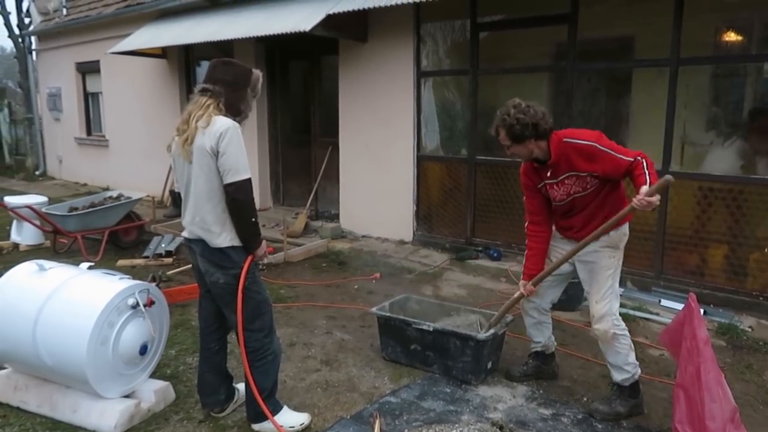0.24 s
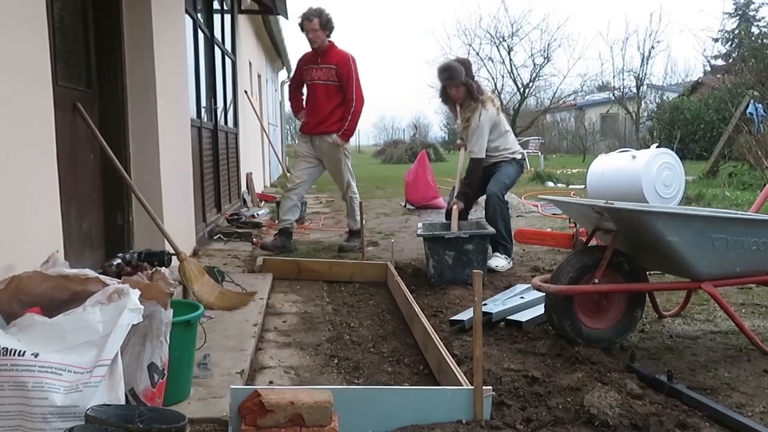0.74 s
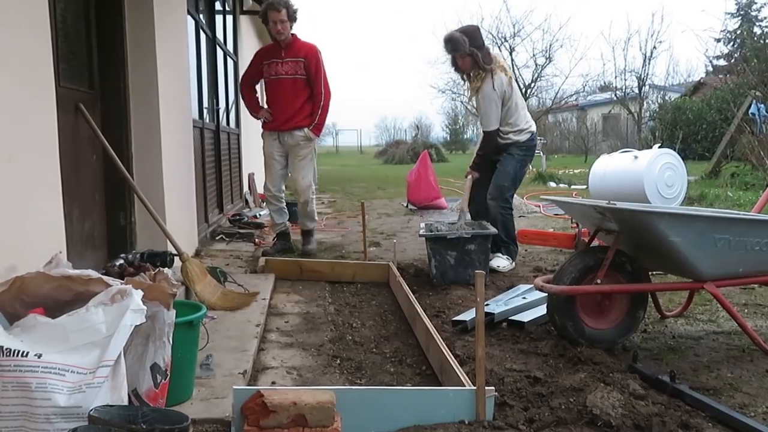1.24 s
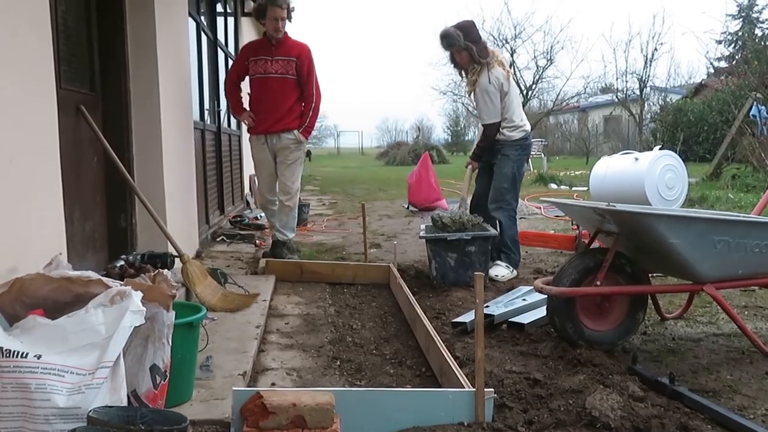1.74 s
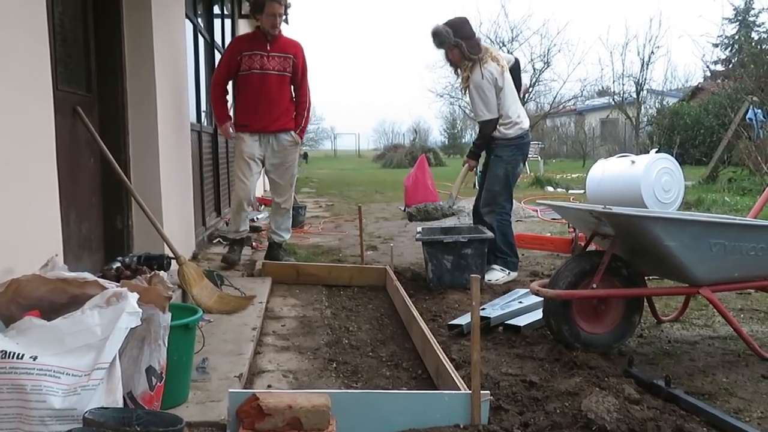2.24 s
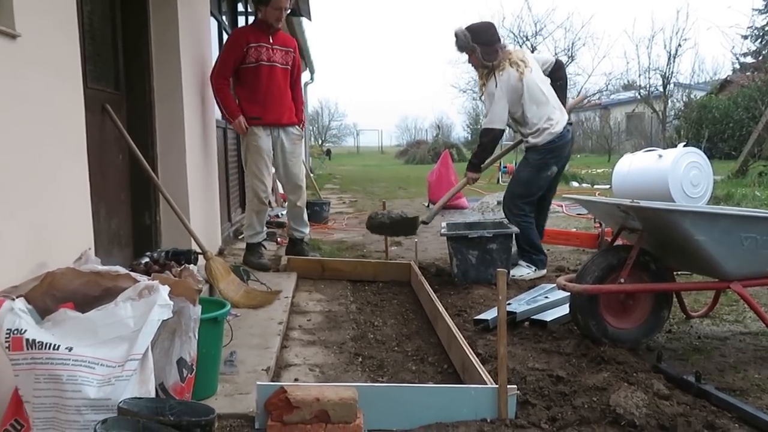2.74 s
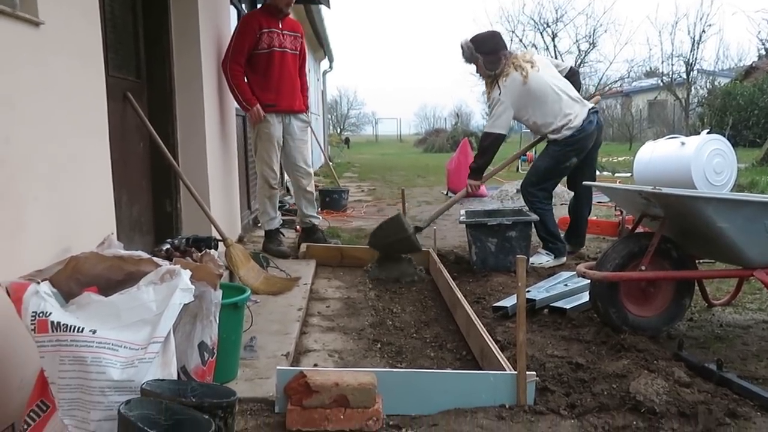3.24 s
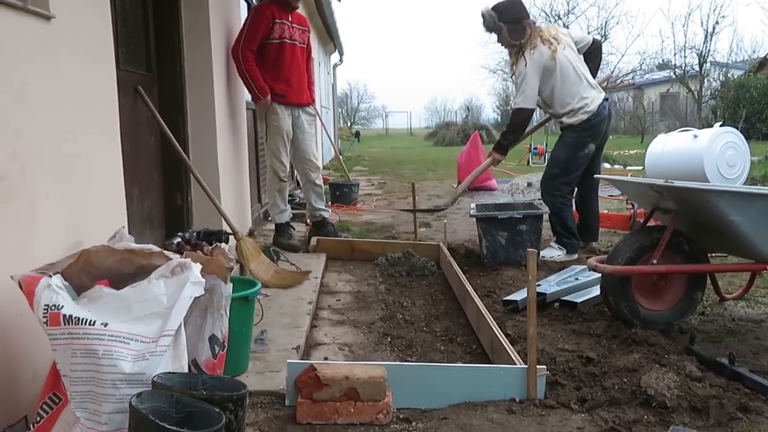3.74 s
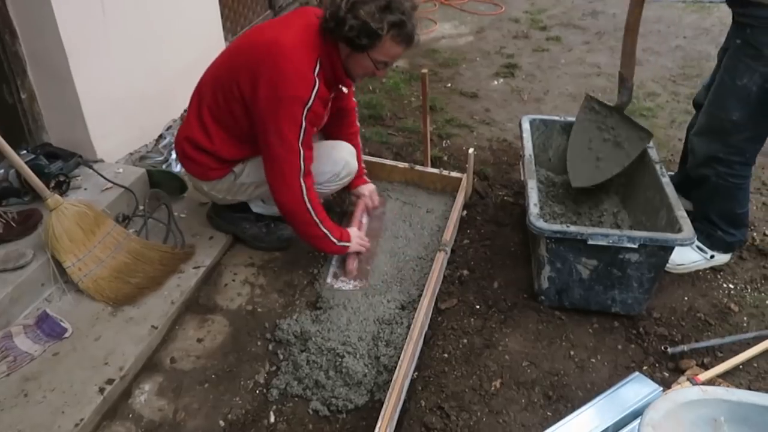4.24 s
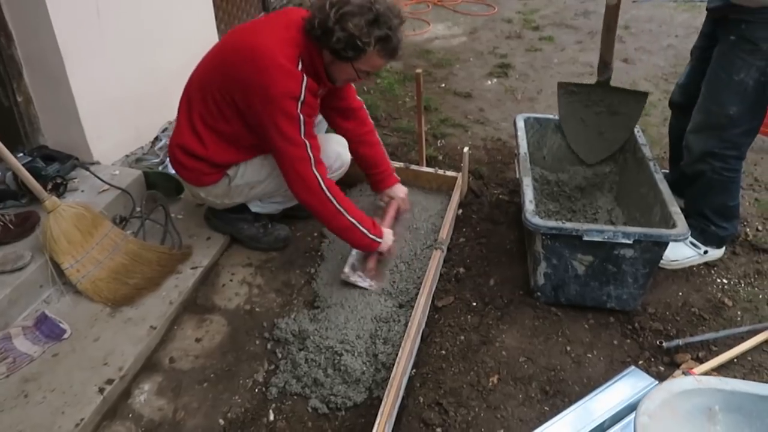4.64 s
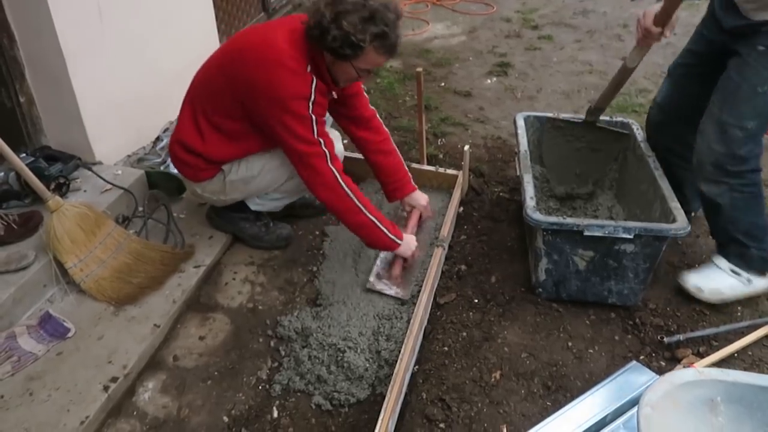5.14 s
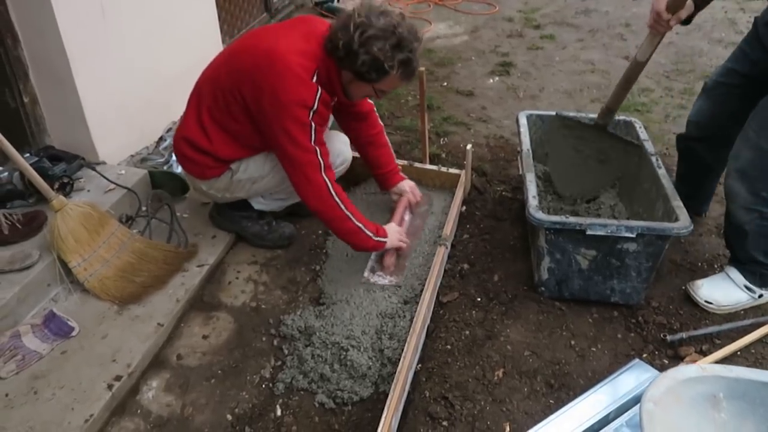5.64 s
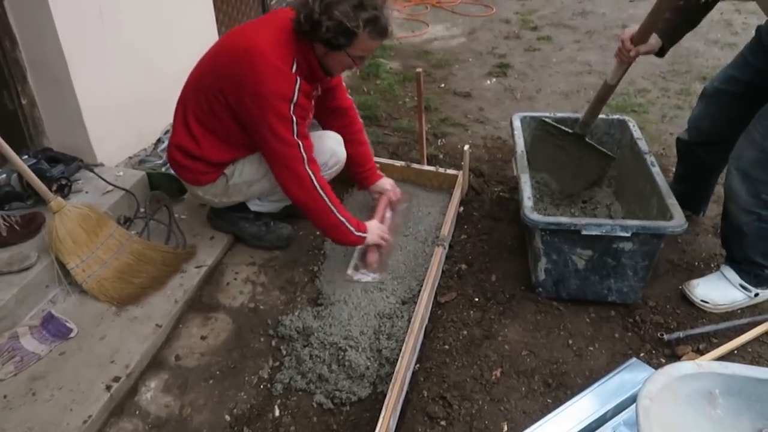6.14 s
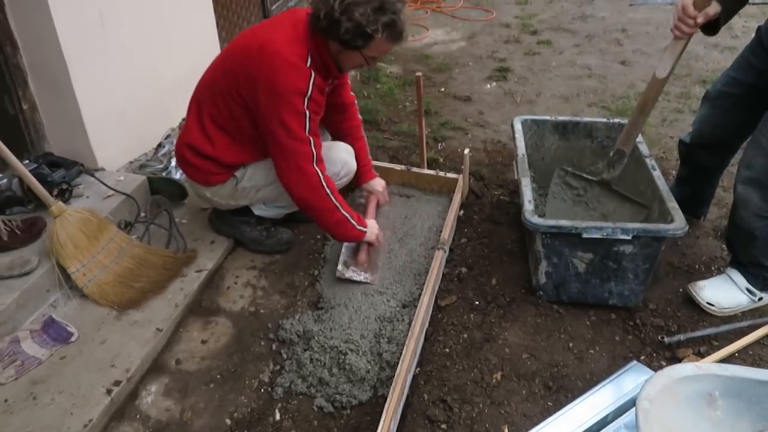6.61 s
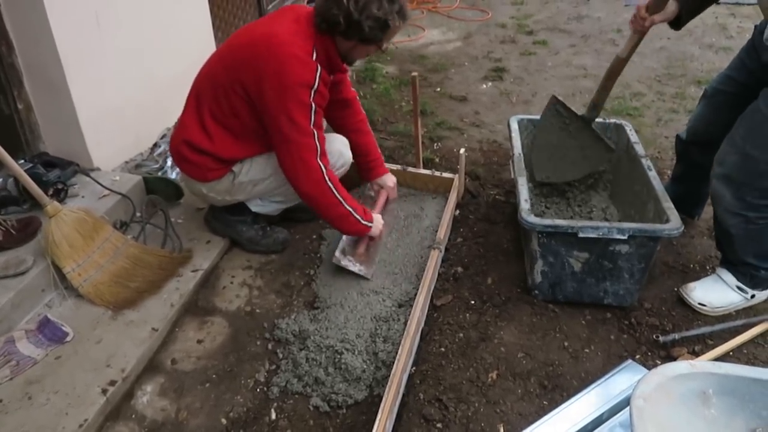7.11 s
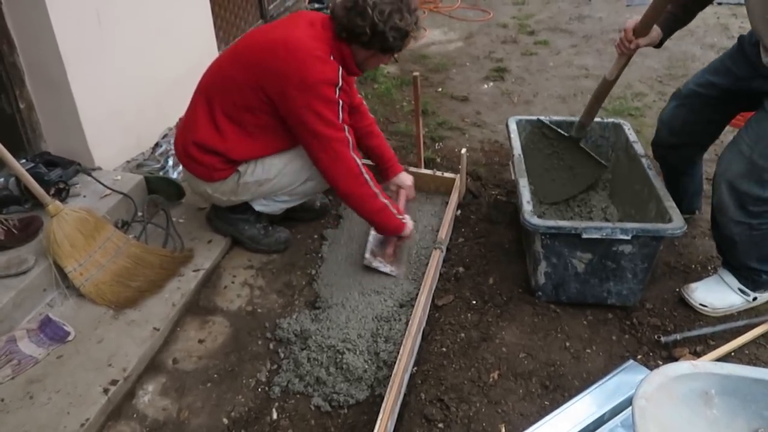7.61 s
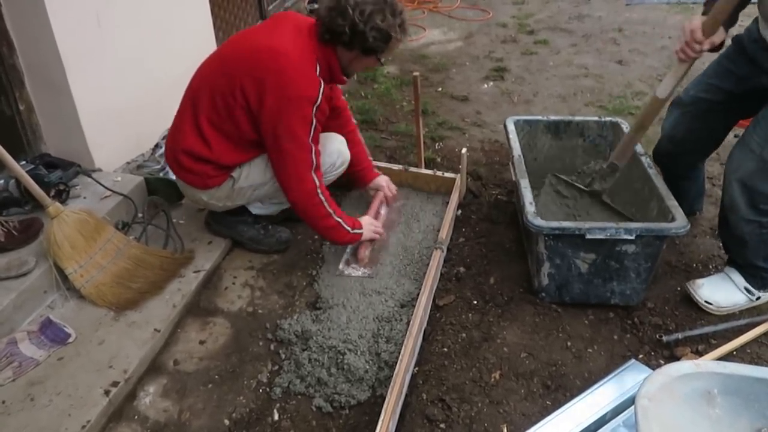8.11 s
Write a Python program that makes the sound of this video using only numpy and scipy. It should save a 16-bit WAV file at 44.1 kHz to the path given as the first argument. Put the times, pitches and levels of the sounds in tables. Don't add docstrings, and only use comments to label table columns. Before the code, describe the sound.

Separate shovel drags through wet gravel come first, moderately distant, with pebble snaps, metallic clinks and hollow tub thuds over faint low traffic. After a quiet stretch and one harsh scrape, the sound abruptly becomes close and loud: a trowel rakes to and fro about three times a second, steel ringing and briefly squealing, with heavy bumps on the plastic tub. Dry open air, compact stereo microphone.

```python
import sys
import numpy as np
from scipy import signal
from scipy.io import wavfile
from scipy.ndimage import uniform_filter1d

SR = 44100
rng = np.random.default_rng(int(sys.argv[2]) if len(sys.argv) > 2 else 0)


def field_ratio(decibels):
    return 10 ** (np.asarray(decibels, dtype=float) / 20)


def wav_out(sig):
    wavfile.write(sys.argv[1], SR, np.round(np.clip(np.atleast_2d(sig).T, -1, 1) * 32767).astype(np.int16))


N = 369116
FIRST_CUT_S, CUT_S = 0.73, 3.9435
MS = np.arange(0, N / SR, 0.001)


def read(points, hz):
    f, value = np.transpose(points)
    return np.interp(np.log(hz + 1), np.log(f + 1), value)


def evened(x):
    return x / np.sqrt(np.mean(x ** 2) + 1e-20)


def curve(rows, t):
    s, *columns = np.transpose(rows)
    return [np.interp(t, s, c) for c in columns]


def add(mix, s, sound):
    part = mix[round(s * SR):][:len(sound)]
    part += sound[:len(part)]


def clicks(per_s, spread_db, dense):
    size_db = spread_db * np.minimum(rng.exponential(1, (2, N)), 3.5)
    size = field_ratio(size_db) * rng.standard_normal((2, N))
    struck = rng.random((2, N)) < per_s / SR
    return evened(size * struck) + dense * rng.standard_normal((2, N))


def drift(shape, wide, long):
    patches = uniform_filter1d(rng.standard_normal(shape), wide, 0)
    return evened(uniform_filter1d(patches, long, 1))


def shaped(x, field, size):
    overlap = size * 3 // 4
    hz, s, z = signal.stft(x, SR, nperseg=size, noverlap=overlap)
    z = z * field_ratio(field(hz[:, None], s))
    return signal.istft(z, SR, nperseg=size, noverlap=overlap)[1][..., :N]


def resonate(x, hz, width):
    r = np.exp(-np.pi * width / SR)
    return signal.lfilter([1 - r, 0, r - 1], [1, -2 * r * np.cos(2 * np.pi * hz / SR), r * r], x)


def ring(hz, t60, rise_s):
    t = np.arange(SR // 2) / SR
    return field_ratio(-60 * t / t60) * np.sin(2 * np.pi * hz * t) * (1 - np.exp(-t / rise_s))


def swells(rows):
    s, db, swell_s, fade_s = np.transpose(rows)[:4, :, None]
    return db - 20 * np.maximum((s - MS) / swell_s, (MS - s) / fade_s)


def leading(levels_db, rows, rest_db, rest_colour):
    view = (MS > CUT_S) * 1
    heard = (np.transpose(rows)[0][:, None] > CUT_S) == view
    levels_db = np.vstack([np.where(heard, levels_db, -np.inf), np.take(rest_db, view)])
    move_colours = np.transpose(rows)[-1][:, None] + 0 * MS
    colours = np.vstack([move_colours, np.resize(rest_colour, 2)[view]])
    weight = field_ratio(2 * levels_db)
    return np.transpose([MS, levels_db.max(0), (weight * colours).sum(0) / weight.sum(0)])


def yard():
    # (frequency [Hz], level per Hz [dB])
    air_colour = [(20, -31.5), (48, -25), (98, -37.5), (119, -3), (154, 6.5), (240, 10.5), (603, 2),
                  (892, 1.5), (1110, -10), (1600, -12), (5950, -38), (15800, -60)]
    # (time [s], level [dB])
    traffic = [(0.0, -42), (0.32, -49), (0.51, -47.5), (1.63, -37), (1.86, -42.5), (3.61, -42.5),
               (3.94, -48.5), (4.1, -67), (4.7, -61), (8.37, -61)]
    # (peak time [s], level [dB], swell [s], fade [s])
    tremors = [
        (4.43, -50, .13, 0.4),
        (4.81, -45, 0.16, .4),
        (5.09, -44, .2, .3),
        (5.99, -46, .33, .23),
        (6.9, -45, 0.88, .15),
        (7.27, -33, 0.064, 0.3),
        (8.37, -46, 0.98, 0.083),
    ]
    t = np.arange(N) / SR

    def field(hz, s):
        return read(air_colour, hz) + 3.2 * drift((len(hz), len(s)), 9, 8)
    air = shaped(rng.standard_normal((2, N)), field, size=2048)
    air_db = -51 - 1.7 * (t > CUT_S)
    hum = resonate(resonate(rng.standard_normal((2, N)), 47, 69), 51, 74)
    tremor_db = np.interp(t, MS, swells(tremors).max(0))
    hum_db = np.maximum(curve(traffic, t)[0], tremor_db) - 2.5
    return field_ratio(air_db) * evened(air) + field_ratio(hum_db) * evened(hum)


def tub():
    # (frequency [Hz], width [Hz], level [dB])
    wall_tones = [(170, 41, -2.5), (212.5, 70, 7), (261.5, 47, 2), (364, 40, 4.5), (491, 53.6, 3),
                  (560, 37, 3), (758, 214, 1.5)]
    # (peak time [s], level [dB], swell [s], fade [s], leading wall tone [Hz])
    far_shoves = [(0., -29, .1, 0.27, 245), (0.304, -29, 0.21, 0.39, 194), (.496, -30.5, 0.2, 0.13, 332),
                  (.622, -30, 0.033, 0.12, 279), (.798, -45, .1, .4, 209), (.876, -32.5, 0.16, 0.14, 258),
                  (1.1, -33.5, 0.039, 0.46, 265), (1.77, -44, 0.021, 0.11, 229),
                  (1.89, -38, 0.29, 0.22, 356), (2.05, -38.5, 0.38, 0.26, 384),
                  (2.91, -43, 0.078, 0.82, 266), (3.28, -33.5, 0.25, 0.26, 520),
                  (3.63, -29.5, 0.016, 0.13, 402), (3.69, -46, .05, 0.36, 395)]
    # (peak time [s], level [dB], swell [s], fade [s], tone [Hz])
    near_shoves = [(3.944, -30.5, .01, .35, 497), (4.42, -28, 0.14, .49, 468), (4.54, -29, 0.53, 0.98, 596),
                   (4.8, -25.5, 0.53, .6, 343), (4.93, -20.5, 0.29, 0.2, 560),
                   (5.2, -27.5, 0.43, 0.79, 624), (5.55, -24.5, 0.081, .6, 607),
                   (5.63, -22.5, 0.13, 0.078, 407), (5.96, -20.5, 0.013, 1.1, 310),
                   (6.088, -27, 0.2, .07, 300), (6.284, -22.5, 0.11, .6, 597),
                   (6.47, -20.5, 0.81, 0.76, 390), (6.606, -18.5, 0.37, 0.15, 332),
                   (6.788, -37, 0.083, 1.2, 360), (7.124, -28, 0.13, 0.63, 636),
                   (7.255, -27.5, 0.014, 0.27, 242), (7.347, -16.5, 0.17, 0.053, 422),
                   (7.487, -26.5, 0.017, 0.65, 298), (7.7, -29, 0.95, 1.1, 620),
                   (8.05, -22, .13, 0.97, 372), (8.113, -12.5, 0.01, 0.087, 420),
                   (8.184, -6.5, 0.037, 0.051, 315), (8.23, -20, .1, 0.12, 332),
                   (8.37, -28, 0.86, 0.11, 270)]
    shoves = far_shoves + near_shoves
    load = leading(swells(shoves), shoves, rest_db=(-79, -37), rest_colour=(200, 520))
    shove_db, lead_hz = curve(load, np.arange(N) / SR)
    lumps = clicks(per_s=1000, spread_db=4.5, dense=0.38)
    walls = 0
    for hz, width, db in wall_tones:
        lead = field_ratio(db + 5.6 * np.exp(-(np.log2(hz / lead_hz) / 0.63) ** 2) - 4)
        lead *= field_ratio(-3.5 * np.maximum(np.log2(lead_hz / hz), 0) ** 2)
        walls += lead * resonate(resonate(lumps, hz, 1.64 * width), hz, 1.64 * width)
    return evened(walls) * field_ratio(shove_db - 4.5)


def rings():
    # (time [s], level [dB], frequency [Hz], t60 [s])
    modes = [(0., -28, 261.6, 0.32), (1.108, -35, 520, 0.14), (3.628, -24, 853, 0.14),
             (3.628, -35, 600, 0.15), (3.629, -35, 350, .15), (3.629, -28, 1280, .04),
             (3.628, -31, 1960, 0.049), (3.628, -39, 2450, .06), (4.424, -39, 81, 0.11),
             (5.441, -36.5, 156, 0.14), (5.954, -30, 83, 0.13), (6.27, -41, 68, .25),
             (5.748, -31, 150, 0.16), (5.958, -27, 126, 0.17), (7.254, -18, 122, 0.073),
             (7.31, -18, 253.6, 0.28), (7.852, -20, 559, 0.25), (7.9, -28, 550, 0.4),
             (7.97, -31.5, 525, .45), (8.113, -8.5, 505, 0.11), (8.18, -15.5, 560, 0.24),
             (8.34, -27.5, 125, 0.12)]
    out = np.zeros(N)
    for s, db, hz, t60 in modes:
        rattle = field_ratio(3.0 * drift((1, SR // 2), 1, 500)[0])
        add(out, s, field_ratio(db) * ring(hz, t60, 0.0007) * rattle)
    return out


def strokes(rows):
    land_s, lift_s, arch_db_per_s = 0.083, 0.065, 7
    land, lift, land_db, lift_db = np.transpose(rows)[:4, :, None]
    way = np.clip((MS - land) / (lift - land), 0, 1)
    arch_db = arch_db_per_s * (lift - land) * np.sin(np.pi * way)
    hold_db = land_db + (lift_db - land_db) * way + arch_db
    return hold_db - 20 * np.maximum(np.maximum((land - MS) / land_s, (MS - lift) / lift_s), 0)


def blade(x, t60, count):
    t = np.arange(1024) / SR
    spot = np.repeat(rng.integers(0, count, N // 500 + 1), 500)[:N]
    spot_rings = rng.standard_normal((count, 1024)) * field_ratio(-60 * t / t60)
    out = 0
    for k, r in enumerate(spot_rings):
        out = out + signal.oaconvolve(x * (spot == k), r[None] / np.linalg.norm(r), axes=1)[:, :N]
    return out


def gravel():
    # (frequency [Hz], level per Hz [dB])
    stir_colour = [(240, -26), (400, -3), (654, -25), (1140, -3), (1750, -10), (2570, -5.5), (3100, -12.5),
                   (3650, -7), (4210, -14.5), (10900, -25), (15800, -30)]
    # (frequency [Hz], level per Hz [dB])
    tip_colour = [(240, -28), (400, -5), (553, -10.5), (1140, -3), (1250, 0), (2570, -3), (3960, -9),
                  (12200, -19.5), (15800, -28)]
    # (frequency [Hz], level per Hz [dB])
    trowel_colour = [(350, -43.5), (600, -10), (651, -13.5), (868, -15.5), (1110, -3.5), (1400, -1.5),
                     (2710, -4), (3410, -9), (4020, -8.5), (4550, -14), (12200, -24.5), (14800, -29.5),
                     (15800, -28)]
    # (peak time [s], drag [dB], 20 dB swell [s], 20 dB fade [s], sand against stones [dB])
    scrapes = [(.008, -36.5, 0.054, 0.27, -7), (.102, -37.5, 0.47, 0.097, -17.5),
               (.304, -33.5, 0.36, 0.36, -16), (.62, -27, 0.36, 0.15, -9.5),
               (.802, -39.5, 0.14, 0.27, -16.5), (.896, -40, 0.21, 0.074, -9), (1.02, -51.5, .2, 0.25, -5),
               (1.105, -42, 0.094, .2, -15), (1.14, -44, .05, 0.37, -11.5), (1.19, -43, .05, .08, -8),
               (1.335, -46.5, .08, 0.15, -4), (1.427, -49.5, 0.33, 0.47, -15.5),
               (1.613, -49.5, 0.22, 0.28, -8), (1.691, -53, .2, 0.15, -7), (1.77, -53.5, .3, .3, -10),
               (1.869, -45.5, 0.17, 0.81, -18.5), (2.12, -60.5, 0.93, 0.28, -25),
               (2.361, -46.5, 0.11, 0.14, -15), (2.499, -42, 0.017, 0.11, 2), (2.869, -48, 0.09, 1, -10.5),
               (3.255, -27, 0.27, 0.16, -5), (3.289, -22, 0.14, 0.12, -9), (3.372, -26, 0.015, 0.03, -22),
               (3.443, -41, .25, 0.049, -24), (3.487, -41.5, 0.11, 0.44, -10), (3.628, -38, .004, 0.1, -24),
               (3.702, -48.5, 0.56, 0.064, 16)]
    # (peak time [s], level [dB], swell [s], fade [s], sand [dB])
    catches = [
        (3.944, -26, 0.013, .3, -17),
        (5.029, -15.5, 0.095, 0.035, -11.5),
        (5.232, -13.5, 0.066, 0.048, -14.5),
        (5.985, -12, 0.035, 0.025, 5),
        (7.24, -25, .003, 0.071, -20),
        (7.349, -13.5, 0.096, 0.01, -7.5),
    ]
    # (landed [s], lifting [s], drag on landing [dB], drag on lifting [dB], sand [dB])
    to_and_fro = [(4.018, 4.267, -14.5, -23, -9.5), (4.376, 4.568, -25, -17, -8),
                  (4.697, 4.903, -20.5, -19, -8), (4.993, 5.08, -21, -26, -12),
                  (5.145, 5.207, -31, -28, -11), (5.288, 5.5, -12, -29, -11), (5.564, 5.73, -31, -23, -7),
                  (5.733, 5.83, -22, -21, -9), (5.966, 6.072, -17.5, -15, -10.5),
                  (6.132, 6.338, -33.5, -15.5, -9.5), (6.35, 6.42, -14.5, -20.5, -9),
                  (6.501, 6.707, -20, -18, -10), (6.803, 6.941, -20, -15.5, -9),
                  (7.088, 7.161, -13.5, -18.5, -7.5), (7.298, 7.313, -19, -20, -3),
                  (7.38, 7.49, -45, -34, -4), (7.49, 7.583, -33.5, -21, -14.5),
                  (7.615, 7.72, -13.5, -17.5, -10), (7.72, 8.018, -16, -29, -11),
                  (8.042, 8.219, -23, -20.5, -9.5), (8.244, 8.372, -26.5, -21.5, -8)]
    # (time [s], tone [Hz], lift [dB], length [s])
    far_drags = [(.113, 3960, 3.7, .064), (.315, 3100, 3, .05), (.374, 1640, 6.7, .05),
                 (.63, 2640, 4.9, 0.11), (.64, 3500, 3, .1), (1.19, 2800, 3.8, 0.04), (1.34, 4500, 5, .06),
                 (3.048, 2170, 3.9, 0.098), (3.158, 3070, 10, 0.1), (3.172, 6720, 6.1, .046),
                 (3.2, 4130, 3.6, 0.041), (3.26, 5340, 3.2, .06), (3.29, 3220, 4, 0.089),
                 (3.367, 6200, 5.4, .04), (3.441, 2070, 3.3, 0.035)]
    # (time [s], tone [Hz], lift [dB], length [s])
    near_drags = [(3.965, 950, 22, 0.026), (4.019, 2000, 6, 0.1), (4.021, 6100, 6, .04),
                  (4.05, 1570, 8.5, .1), (4.053, 1190, 9.5, 0.07), (4.067, 4030, 6, .03),
                  (4.174, 2500, 7, .043), (4.22, 6050, 4.5, .13), (4.3, 990, 13, 0.11),
                  (4.538, 2670, 8, 0.041), (4.93, 980, 18, 0.12), (5.124, 1460, 11, 0.25),
                  (5.128, 1000, 17, 0.22), (5.21, 3100, 6.5, 0.039), (5.25, 2230, -2.5, 0.2),
                  (5.29, 1380, 4.5, 0.27), (5.303, 3700, 4, 0.046), (5.372, 1870, 4, .052),
                  (5.542, 950, 18, .096), (5.582, 1420, 12.5, .08), (5.94, 2870, 7, .058),
                  (5.983, 5080, 2.5, .044), (6.065, 1410, 9, 0.084), (6.085, 4050, 6.5, 0.048),
                  (6.359, 4130, 8.5, .058), (6.36, 2880, 3, 0.061), (6.388, 2560, 8, .052),
                  (6.46, 950, 11, .078), (6.462, 1690, 16, .037), (6.473, 4310, 2, 0.095),
                  (6.58, 2580, 6.5, .061), (6.654, 1910, 5, .1), (6.68, 1090, -2, 0.17),
                  (6.91, 2130, -6, 0.22), (7.11, 2900, 4, 0.16), (7.2, 950, 26, 0.059),
                  (7.27, 4390, 6, 0.039), (7.372, 1360, 12, 0.22), (7.484, 5510, 7, 0.043),
                  (7.487, 2870, 13, 0.043), (7.553, 930, 17, 0.087), (7.61, 1760, 9.5, .079),
                  (7.74, 2420, 8, 0.063), (7.752, 1480, 9.5, .053), (8.036, 4600, 4, .052),
                  (8.07, 2450, 6.5, 0.042), (8.075, 1480, 12, 0.043), (8.207, 3220, 5, 0.082)]
    bumps = scrapes + catches
    levels_db = np.vstack([swells(bumps), strokes(to_and_fro)])
    rows = leading(levels_db, bumps + to_and_fro, rest_db=(-57, -37.5), rest_colour=-10)

    def field(hz, s):
        far = np.where(s < FIRST_CUT_S, read(stir_colour, hz), read(tip_colour, hz))
        colour = np.where(s < CUT_S, far, read(trowel_colour, hz))
        sand_share = np.clip(np.log2(hz / 3000 + 1e-3) / 1.6, -0.15, 1)
        chatter = 0.47 * drift((1, len(s)), 1, 3)
        for at, tone_hz, lift_db, length in far_drags + near_drags:
            near_tone = np.exp(-(np.log2((hz + 1) / tone_hz) / 0.14) ** 2)
            colour = colour + lift_db * near_tone * np.exp(-((s - at) / (0.4 * length)) ** 2)
        blotches = 2.1 * np.tanh(0.24 * drift((len(hz), len(s)), 3, 10))
        return colour + sand_share * (curve(rows, s)[1] + 11) + blotches + chatter
    drag_db = curve(rows, np.arange(N) / SR)[0]
    clumps_db = 1.3 * drift((1, N), 1, 300)
    ticks = clicks(per_s=5000, spread_db=0.5, dense=1.0) * field_ratio(drag_db + clumps_db)
    steel = blade(ticks, t60=0.07, count=18)
    return field_ratio(13.0) * shaped(0.68 * ticks + 0.36 * steel, field, size=512)


def pebbles():
    # (time [s], peak level [dB])
    snaps = [(.0223, -20), (.0568, -23), (.0822, -28), (.1037, -27), (.111, -30), (.127, -30), (.187, -35),
             (.2294, -35), (.2394, -32), (.394, -36), (.4224, -34), (.517, -26), (.599, -21), (1.3029, -38),
             (1.3305, -37), (1.4737, -42), (1.5994, -42), (1.6827, -41), (2.3816, -42), (3.1015, -30),
             (3.4391, -29), (3.4845, -31), (3.6275, -24), (3.85, -40), (3.9444, -19), (4.6448, -19),
             (5.0858, -13), (5.1182, -19), (5.1406, -17), (5.1895, -16), (5.207, -11), (5.32, -6),
             (6.1583, -19), (6.2032, -18), (6.4562, -15), (7.2384, -17), (7.2518, -16), (7.2853, -10),
             (7.4863, -18), (7.5182, -20), (8.0321, -17)]
    t60_s, centre_hz, width_hz = 0.012, 3200, 5000
    out, t = np.zeros(N), np.arange(800) / SR
    for (s, db), snap in zip(snaps, rng.standard_normal((len(snaps), len(t)))):
        add(out, s, field_ratio(db + 1 - 60 * t / t60_s) * snap)
    out = resonate(resonate(out, centre_hz, width_hz), centre_hz, 2 * width_hz)
    return np.array([out, 0.3 * np.roll(out, 30)])


def tub_bumps():
    # (time [s], peak level [dB], wall tone [Hz], t60 [s])
    hits = [(0.253, -24.5, 170, 0.26), (0.304, -16, 162, 0.076), (.313, -25, 187, .06),
            (.448, -35, 393, 0.11), (.491, -30, 364, .07), (0.609, -27, 190, 0.055),
            (0.797, -25.5, 200, 0.097), (.832, -25, 386, 0.052), (.873, -26, 261, .07),
            (.954, -32, 230, 0.077), (1.102, -27, 292, 0.14), (1.26, -38, 277, .07),
            (1.764, -28, 256, 0.089), (3.629, -37, 300, 0.047), (4.416, -33, 153, 0.13),
            (4.482, -18.5, 615, 0.046), (4.604, -29, 155, 0.12), (4.804, -17.5, 379, 0.086),
            (5.023, -27.5, 238, 0.15), (5.956, -8.5, 333, 0.052), (6.268, -30, 250, 0.1),
            (6.34, -24, 544, 0.23), (6.389, -19.5, 539, 0.19), (6.467, -14.5, 364, 0.12),
            (6.5, -19, 520, 0.14), (6.55, -14, 340, 0.076), (6.582, -14.5, 335, 0.061),
            (6.604, -13.5, 351, 0.08), (6.766, -19, 268, 0.037), (6.789, -26, 592, 0.12),
            (6.857, -20, 255, 0.047), (7.252, -14.5, 238, 0.048), (7.29, -17, 219, 0.053),
            (7.492, -20, 301, 0.052), (7.758, -32, 223, .08), (7.764, -20, 600, 0.075),
            (8.036, -24.5, 258, 0.13), (8.051, -22, 520, 0.14), (8.111, -10.5, 317, 0.09),
            (8.17, -5.5, 299, 0.11), (8.344, -16, 190, 0.036)]
    out = np.zeros(N)
    for s, db, hz, t60 in hits:
        wall = ring(hz, t60, 0.0012)
        wall += 0.28 * ring(0.623 * hz, 1.9 * t60, 0.01)
        wall += 0.5 * ring(1.6 * hz, 1.3 * t60, 0.0067)
        add(out, s, field_ratio(db + 1.5) * wall)
    return out


def clinks():
    # (time [s], peak level [dB], pitch factor, crack [dB])
    strikes = [
        (0.517, -21, 1.06, -9),
        (0.802, -17.5, 1.06, -13),
        (1.098, -16.5, 1.02, -1),
        (1.422, -28, 1.15, 4),
        (2.345, -28.5, 1.1, 0),
        (3.368, -20, 1.1, -15),
    ]
    # (frequency [Hz], level [dB], t60 [s], damped to 0.11 s at most)
    modes = [(393, -0.5, 0.94), (620, 0, 0.17), (850, 2, 0.23), (1350, -1, 0.23), (1415, -6, 0.19),
             (2300, -32, 0.36)]
    out = np.zeros(N)
    detune = rng.uniform(0.94, 1.04, (len(strikes), len(modes)))
    for (s, db, pitch, crack_db), shifts in zip(strikes, detune):
        sheet = 0
        for (hz, mode_db, t60), shift in zip(modes, shifts):
            sheet = sheet + field_ratio(mode_db) * ring(hz * shift * pitch, min(t60, 0.11), 0.0013)
        t = np.arange(len(sheet)) / SR
        crack = rng.standard_normal(len(sheet)) * field_ratio(crack_db - 60 * t / 0.033)
        add(out, s, field_ratio(db - 13.5) * (sheet + resonate(crack, 1000, 2500)))
    return out


def squeals():
    # (time [s], level [dB], pitch [Hz], waver [Hz], length [s])
    cries = [(3.294, -29, 1534, 90, 0.085), (5.01, -12.5, 2930, 250, 0.039), (5.253, -15, 1300, 250, 0.078),
             (6.038, -9, 1460, 195, 0.046), (7.237, -33, 2930, 1500, 0.011), (7.26, -22, 4400, 160, 0.044),
             (7.265, -17, 1520, 150, 0.061), (7.309, -15, 1469, 150, 0.025),
             (7.333, -5.5, 1435, 120, 0.027), (7.315, -18.5, 602, 59.7, 0.055),
             (7.321, -14, 2900, 200, .03), (7.28, -31, 5400, 250, 0.083), (7.34, -33, 6900, 250, 0.023),
             (7.368, -34, 1400, 120, .08), (7.647, -23, 790.4, 46.3, 0.13)]
    out = np.zeros(N)
    for s, db, hz, waver_hz, length in cries:
        swell = np.hanning(round(length * SR))
        slip = drift((2, len(swell)), 1, 90)
        tone = np.sin(2 * np.pi * np.cumsum(hz + 0.53 * waver_hz * slip[0]) / SR)
        add(out, s, field_ratio(db - 2.5 + 5.1 * slip[1]) * tone * swell)
    return out


def knocks():
    out = rings() + tub_bumps() + clinks() + squeals()
    return np.array([out, 0.064 * np.roll(out, 70)])


def scene():
    # (frequency [Hz], level [dB])
    port_difference = [
        [(60, -17), (150, -21), (380, -9), (950, -16), (2380, -15), (5980, -7), (15000, -10)],
        [(60, -28), (150, -8.5), (380, -3), (950, -10), (2380, -12), (5980, -7.5), (15000, -1.5)],
        [(60, -26), (110, -26), (200, -21), (380, -25), (700, -23), (1290, -27), (2380, -23), (4400, -10), (8120, -10), (15000, -3)],
    ]
    shared, apart = yard() + tub() + gravel() + pebbles() + knocks()

    def field(hz, s):
        view = np.choose(np.digitize(s, [FIRST_CUT_S, CUT_S]), [read(a, hz) for a in port_difference])
        return view - 3.5 + 8.0 * drift((len(hz), len(s)), 30, 6)
    apart = shaped(apart, field, size=2048)
    treble_filter = signal.butter(1, 2500, "highpass", fs=SR, output="sos")
    treble = signal.sosfiltfilt(treble_filter, shared)
    view = np.digitize(np.arange(N) / SR, [FIRST_CUT_S, CUT_S])
    lead = np.array([0.03, 0.2, 0.35])[view]
    apart = apart + lead * np.gradient(treble) + 0.053 * treble
    return np.array([shared + apart, shared - apart])


def roll_off(x):
    return signal.sosfilt(signal.butter(12, 15830, fs=SR, output="sos"), x)


def record(dry):
    thin = signal.sosfilt(signal.butter(2, 42, "highpass", fs=SR, output="sos"), dry)
    mix = 0.85 * np.tanh(thin / 1.041)
    return roll_off(mix)


dry = scene()
out = record(dry)
wav_out(out)
```